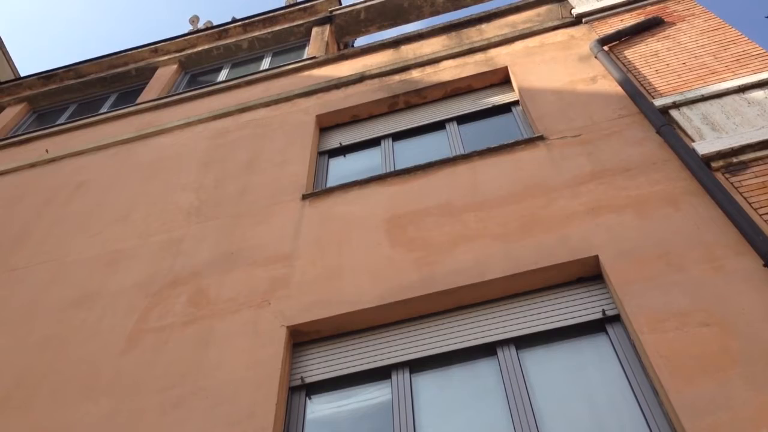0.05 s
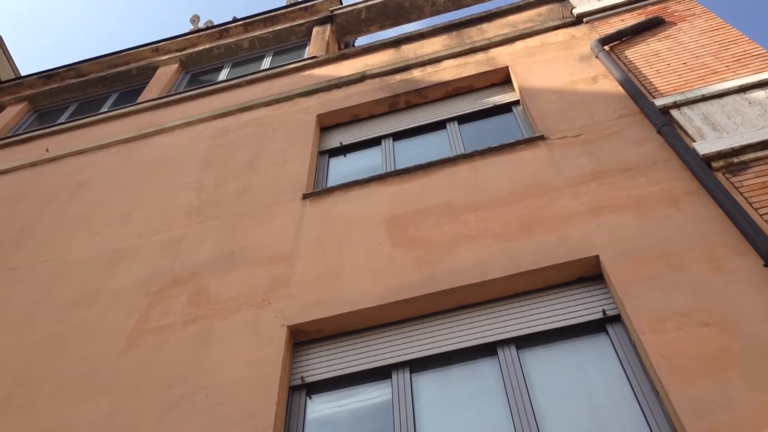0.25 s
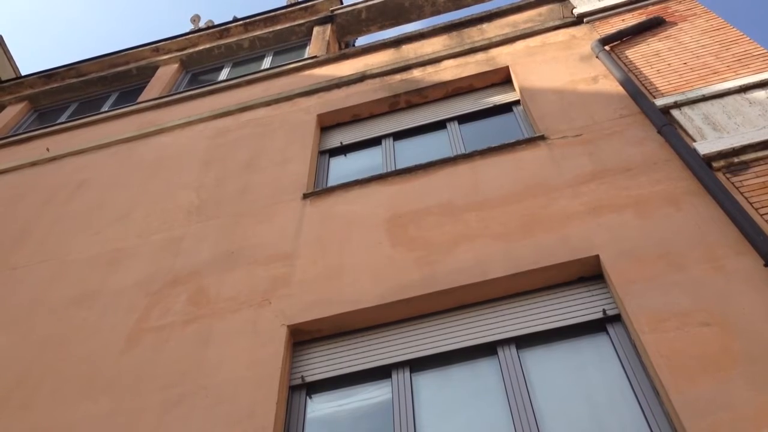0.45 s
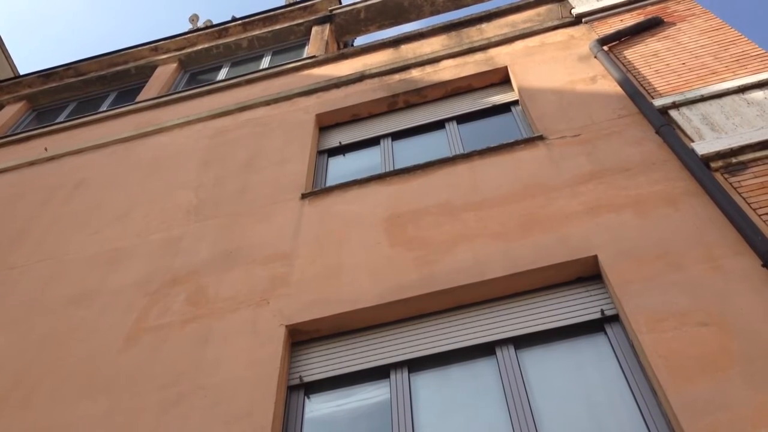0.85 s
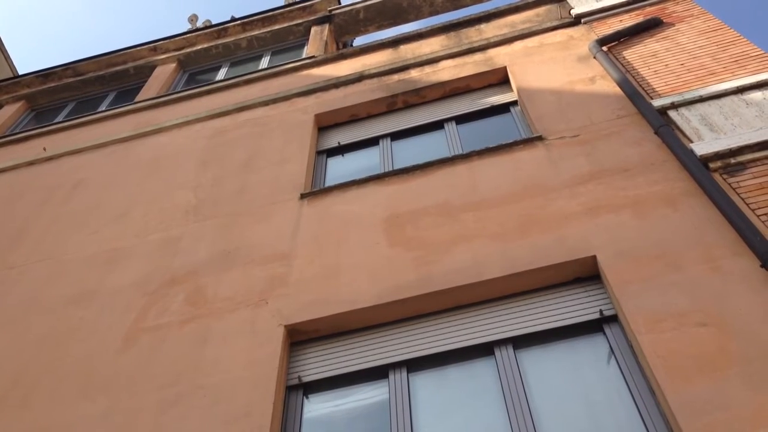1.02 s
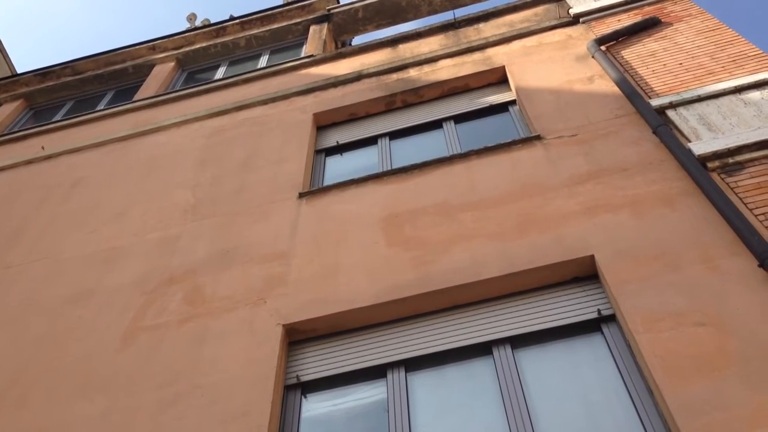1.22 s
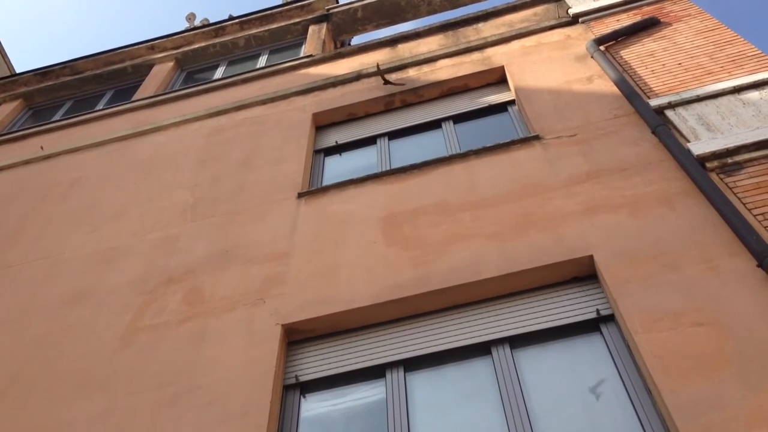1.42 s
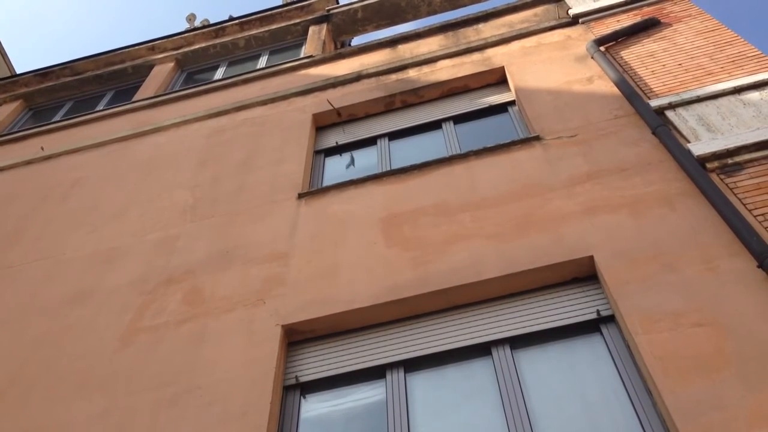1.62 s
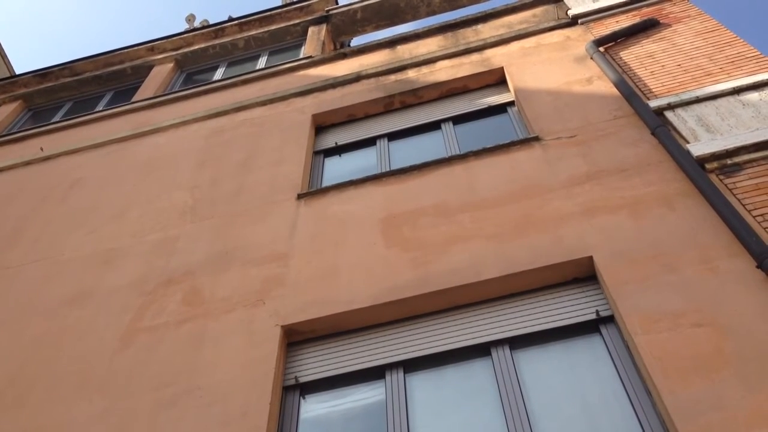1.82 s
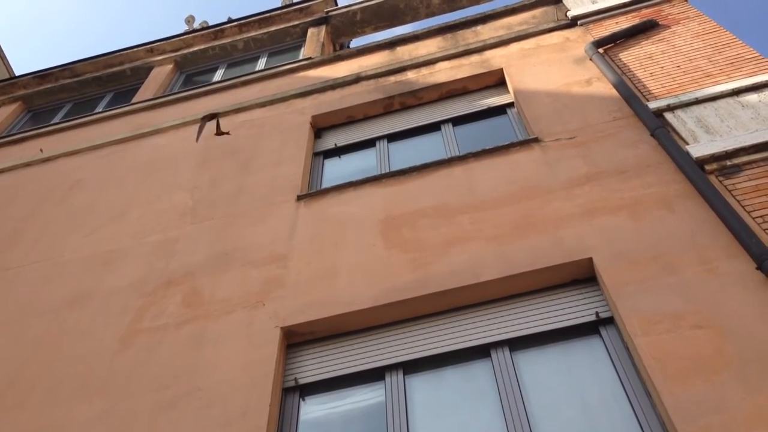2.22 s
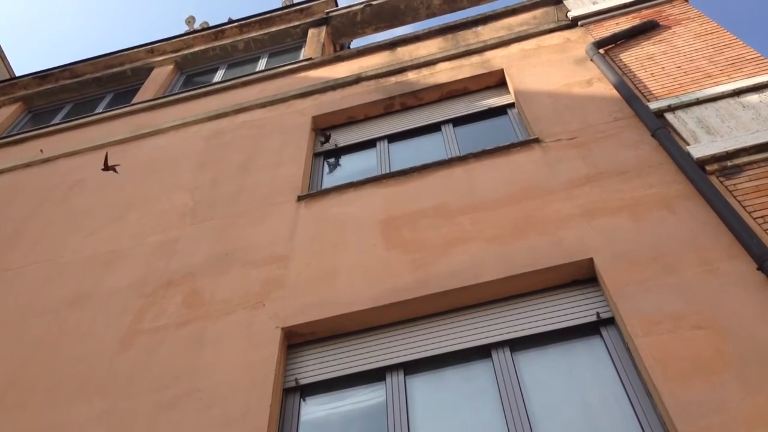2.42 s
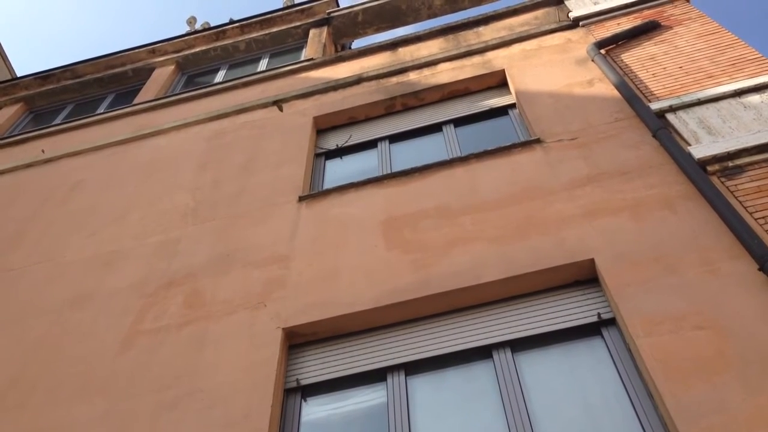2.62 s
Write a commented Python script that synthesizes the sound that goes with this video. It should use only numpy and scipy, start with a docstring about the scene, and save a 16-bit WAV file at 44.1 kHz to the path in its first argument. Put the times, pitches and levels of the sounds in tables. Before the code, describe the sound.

High, trilling swift screams, hoarse at times, alternate with thin arched whistles from a second bird. Heard outdoors beside a building, the calls have a short echo, with a quiet rumble of town traffic underneath.

```python
"""Swifts duetting over a town

Swifts chase past a house front, over distant traffic, a motor's hum and faint rustles.
One bird's syrinx gives shrill trilled screams that break up into chips; when hoarse, its two sides
sound at different pitches. Another answers each scream with a thin arched whistle that beats
and stutters as it falls. The walls echo both."""
import sys
import numpy as np
from scipy import signal
from scipy.fft import rfft, irfft
from scipy.io import wavfile
from scipy.ndimage import uniform_filter1d

SR = 44100
rng = np.random.default_rng(int(sys.argv[2]) if len(sys.argv) > 2 else 0)


def inscribe(sig):
    """Save sig as 16-bit PCM at rate SR to the path in sys.argv[1].

    A 1-D sig is mono; a 2-D sig holds one channel per row.
    Samples are clipped to [-1, 1] before scaling.
    """
    pcm = np.round(np.clip(np.atleast_2d(sig).T, -1, 1) * 32767)
    wavfile.write(sys.argv[1], SR, pcm.astype(np.int16))


N = 121275
T = np.arange(N) / SR


def amp(db):
    return 10 ** (np.asarray(db) / 20)


def unit(x):
    return x / np.sqrt(np.mean(x ** 2))


def walk(rate_hz):
    """Smooth random drift, unit RMS."""
    width = max(int(SR / rate_hz), 1)
    smoothed = uniform_filter1d(rng.standard_normal(N), width, mode="wrap")
    return unit(uniform_filter1d(smoothed, width, mode="wrap"))


def curves(rows):
    """Each column after the first, interpolated over time."""
    times_s, *columns = np.array(rows, float).T
    return [np.interp(T, times_s, column) for column in columns]


def gate(start_s, end_s, edge_s=.0039):
    return np.clip((T - start_s) / edge_s, 0, 1) * np.clip((end_s - T) / edge_s + 1, 0, 1)


def noise(gain):
    """Unit-RMS noise shaped by gain(Hz)."""
    bins_hz = np.fft.rfftfreq(N, 1 / SR) + 1e-3
    return unit(irfft(rfft(rng.standard_normal(N)) * gain(bins_hz), N))


def spectrum(points):
    """Gain function through (frequency [Hz], gain [dB]) points."""
    hz, db = np.array(points, float).T
    return lambda f: amp(np.interp(np.log(f), np.log(hz), db))


def phase(hz):
    return 2 * np.pi * np.cumsum(hz) / SR


def town():
    """Distant traffic as broad noise; one motor's wavering hum as a narrow band."""
    # traffic spectrum (frequency [Hz], relative density [dB])
    traffic_spectrum = [(20, -18), (35, -17), (55, 5), (90, -3.5), (150, 4), (230, 0), (350, -5.5),
                        (600, -10), (1000, -13.5), (1700, -13), (2800, -24.5), (4500, -22), (6000, -29.5),
                        (8000, -31.5), (10500, -30), (12300, -27), (15000, -34.5)]
    # traffic envelope (time [s], level [dB])
    traffic_level = [(0, -54), (.9, -52), (1.7, -51.5), (2.75, -52)]
    # motor envelope (time [s], level [dB])
    hum_level = [(0, -79), (1.1, -72), (1.6, -61.5), (2.5, -59.5), (2.75, -70)]
    hum_hz, half_width_hz = 473.6, 20.5
    traffic = noise(spectrum(traffic_spectrum)) * amp(curves(traffic_level)[0] + .4 * walk(6))
    hum = noise(lambda f: 1 / (1 + ((f - hum_hz) / half_width_hz) ** 2)) * amp(curves(hum_level)[0])
    return traffic + hum


def rustles():
    """Faint rustles and a tick: half-sine bursts of band noise."""
    # bursts (start [s], length [s], centre [Hz], width [octaves], level [dB])
    bursts = [(1.319, .007, 5000, 0.51, -53), (1.859, 0.04, 9900, 0.41, -60.5),
              (1.862, .022, 4440, .1, -58), (1.864, 0.02, 330, 0.6, -55), (1.911, 0.055, 1310, 0.53, -58)]
    out = np.zeros(N)
    for start_s, length_s, hz, width_oct, db in bursts:
        band = noise(lambda f: np.exp(-.5 * (np.log2(f / hz) / width_oct) ** 2))
        out += amp(db) * np.sin(np.pi * np.clip((T - start_s) / length_s, 0, 1)) * band
    return out


def street(x):
    """Direct sound, one reflection from the house front, a diffuse tail from the other walls."""
    wall_s, wall_db = .0105, -9.5
    t60_s, rise_s, tail_db = .64, .02, -13.5
    echo = np.interp(T - wall_s, T, x, left=0)
    tail = noise(lambda f: 1 / np.hypot(1, f / 9000)) * amp(-60 * T / t60_s) * np.clip(T / rise_s, 0, 1)
    reverb = signal.fftconvolve(x, unit(tail) / np.sqrt(N))[:N]
    return x + amp(wall_db) * echo + amp(tail_db) * reverb


def voice_colour(x):
    """Microphone colouring of both voices: a dip near 8 kHz, a resonance near 12 kHz."""
    # microphone response (frequency [Hz], gain [dB])
    response = [(3000, 3.5), (7400, -0.5), (8100, -8), (9000, -6.5), (10800, -3), (11800, -0.5),
                (12600, -1.5), (13600, -9.5), (14500, -11), (15400, -2)]
    bins_hz = np.fft.rfftfreq(2 * N, 1 / SR) + 1e-3
    return irfft(rfft(x, 2 * N) * spectrum(response)(bins_hz))[:N]


def syrinx(hz, octave_db):
    """A bird's voice: a nearly pure tone with a weak octave."""
    angle = phase(hz)
    return np.sqrt(2) * (np.sin(angle) + amp(octave_db) * np.sin(2 * angle))


def chips():
    """Short gliding notes with a quick rise, mostly at the ends of screams."""
    # chips (start [s], length [s], pitch [Hz], glide [Hz], level [dB])
    notes = [(0.846, 0.0033, 6130, -400, -39), (.888, 0.0076, 5830, -100, -37.5),
             (0.896, 0.012, 5880, -2, -44), (0.9158, 0.0047, 5516, -350, -35.5),
             (0.925, 0.013, 5430, 104.5, -53), (1.267, 0.012, 6880, 150, -36),
             (1.291, 0.023, 6910, -2, -41), (1.320, 0.013, 6600, -100, -46.5),
             (1.35, 0.0035, 5070, -400, -35.5), (1.354, 0.013, 5100, 106, -56),
             (1.839, 0.012, 6490, 399.5, -45), (1.848, 0.0042, 6150, -500, -39.5),
             (1.851, 0.0064, 6460, -0.5, -52), (1.869, 0.013, 6710, -2, -45.5),
             (1.896, 0.016, 6600, 1.5, -52), (2.439, 0.014, 6640, 251.5, -44),
             (2.466, 0.016, 6500, -100, -44), (2.494, .004, 5660, 301.5, -39)]
    out = np.zeros(N)
    for start_s, length_s, hz, glide_hz, db in notes:
        progress = np.clip((T - start_s) / length_s, 0, 1)
        envelope = amp(db) * np.abs(np.sin(np.pi * progress ** .57)) ** .78
        out += envelope * syrinx(hz + glide_hz * (progress - .5) + 60 * walk(910), octave_db=-23)
    return out


def whistle(contour):
    """A thin arched note that beats against a tone just above it and stutters as it falls."""
    beat_hz, stutter_hz, stutter_below_hz = 233, 70.4, 6000
    hz, db, depth = curves(contour)
    start_s, end_s = contour[0][0], contour[-1][0]
    low = np.clip((stutter_below_hz - hz) / 400, 0, 1)
    late = np.clip(.16 + (T - start_s) / (end_s - start_s), 0, 1)
    stutter = 1 + .92 * low * late * np.cos(2 * np.pi * stutter_hz * (T - end_s + .0033))
    hz = hz + (5 + 40 * depth + 80 * low ** 2) * walk(600)
    octave_db = -11 - 8 * low
    tone = (syrinx(hz, octave_db) + depth * syrinx(hz + beat_hz, octave_db)) / np.hypot(1, depth)
    flutter_db = (1.8 + 2 * depth) * walk(110)
    return gate(start_s, end_s) * amp(db - 4.5 * low + flutter_db) * np.maximum(stutter, .1) * tone


def trill(cycle, rough, age_s):
    """One pulse per cycle, deepening at onset; narrower and less even when hoarse."""
    onset_s = .015
    sharpness = (.64 + .13 * rough) * np.clip(age_s / onset_s, 0, 1) ** 2
    pulses = (.51 - .5 * np.cos(cycle)) ** sharpness
    local_rms = np.sqrt(uniform_filter1d(pulses ** 2, size=1000))
    scatter_db = 1.76 * (.5 + rough) * walk(260)
    return pulses / local_rms * amp(scatter_db)


def split_voice(hz, rough):
    """The two sides of the syrinx sound apart; the upper one grows with hoarseness."""
    split_hz, octave_db = 480, -22.5
    jitter_hz, upper_gain = 10.4 + 113 * rough, .75 * rough
    lower_hz = hz - split_hz * upper_gain ** 2 / (1 + upper_gain ** 2)  # power stays centred on hz
    lower = syrinx(lower_hz + jitter_hz * walk(606), octave_db)
    upper = syrinx(lower_hz + split_hz + jitter_hz * walk(610), octave_db)
    return (lower + upper_gain * upper) / np.hypot(1, upper_gain)


def rasp(hz):
    """Hoarse hiss, plus a faint blurred tone below the voice."""
    # hiss spectrum (frequency [Hz], relative density [dB])
    hiss_spectrum = [(2500, -17), (3500, -8), (4300, 1.5), (5000, 2), (6000, 2.5), (7000, -10), (7900, 0),
                     (9000, -1), (10000, -16), (12400, 1), (13200, -1), (15000, -45)]
    hiss = noise(spectrum(hiss_spectrum))
    low_tone = np.sin(phase(.66 * hz + 191 * walk(1500)))
    return amp(-18) * hiss + amp(-24.5) * low_tone


def scream(contour, trill_span_hz):
    """A high tone chopped into fast chirping pulses; hoarseness makes it split, stray and rasp."""
    undertone_above_hz, undertone_decay_s, rasp_rise_s = 6450, .045, .26
    hz, db, rough = curves(contour)
    start_s, end_s = contour[0][0], contour[-1][0]
    rough, age_s = np.clip(rough, 0, 1), np.abs(T - start_s)
    trill_hz = np.interp(T, [start_s, end_s], trill_span_hz)
    cycle = phase(trill_hz * (1 + (.012 + .1 * rough ** 2) * walk(213)))
    pulses = trill(cycle, rough, age_s)
    sweep_hz = (80 + 70 * rough) * np.sin(cycle + 2 * np.pi * .02)
    hz = hz + sweep_hz + 69 * rough * walk(92)
    voice = split_voice(hz, rough)
    high = np.clip((hz - undertone_above_hz) / 300, 0, 1)
    undertone = amp(-11) * np.exp(-age_s / undertone_decay_s) * high * np.sin(phase(hz / 2))
    rasp_gain = np.sqrt(rough) * np.clip(age_s / rasp_rise_s, 0, 1)
    return gate(start_s, end_s) * amp(db) * pulses * (voice + undertone + rasp_gain * rasp(hz))


def swifts():
    """One bird screams and chips; the other whistles in answer."""
    # one contour per scream (time [s], pitch [Hz], level [dB], roughness [about 0-1])
    scream_contours = [
        [(.189, 5100, -47.5, 0.03), (.198, 5900, -54.5, 0), (.218, 6910, -43.5, 0.02),
         (.245, 7110, -47.5, 0.01), (.31, 7170, -40.5, 0.19), (.345, 7150, -37.5, 0.73),
         (.378, 7060, -37, 0.75), (.396, 6566, -34.5, 0.23), (.428, 6612, -33.5, 0.19),
         (.51, 6710, -36.5, 0.39), (.545, 6670, -37, 0.44), (.61, 6810, -43.5, 0.37), (.68, 6455, -46.5, 0.78),
         (.745, 6140, -46.5, 0.92), (.79, 6120, -53.5, 1.01), (.865, 6000, -56, 0.93)],
        [(1.043, 4830, -51, 0), (1.053, 5620, -38, 0.2), (1.072, 6115, -38.5, 0.08), (1.102, 6170, -41, 0),
         (1.123, 6240, -38, 0.02), (1.139, 6200, -40.5, 0.2), (1.16, 6340, -37, 0.2), (1.193, 6190, -43, 0.45),
         (1.24, 6300, -42, 0.73), (1.26, 6350, -63, 0.87)],
        [(1.597, 6200, -60, 0.06), (1.625, 6740, -47.5, 0.17), (1.675, 6860, -51.5, 0.26),
         (1.715, 6730, -47.5, .3), (1.752, 6170, -48, 0.52), (1.802, 5985, -43.5, 0.41),
         (1.835, 6150, -53, 0.58)],
        [(2.18, 6440, -55, 0.01), (2.208, 6700, -54, .1), (2.218, 6500, -43, 0), (2.25, 6460, -48, .3),
         (2.285, 6020, -46.5, 0.35), (2.315, 6260, -45, 0.08), (2.37, 6220, -48, 0.77),
         (2.428, 6080, -51.5, 1.05)],
    ]
    # pulse rate per scream (at start [Hz], at end [Hz])
    trill_spans = [(274.5, 230), (262, 232), (256, 200), (258, 250)]
    # one contour per whistle (time [s], pitch [Hz], base level [dB], beat depth [0-1])
    whistle_contours = [
        [(.505, 4470, -48, 0.14), (.543, 5700, -48, .3), (.57, 5950, -59, 0.7), (.85, 5900, -64, 0.82),
         (.95, 5790, -64, 0.54), (.972, 5660, -52, .1), (.996, 5400, -52, .1), (1.005, 5240, -44, 0.44),
         (1.037, 4550, -54, 0.6)],
        [(1.278, 5120, -55, .1), (1.308, 5720, -46, 0), (1.365, 5900, -60, 0.7), (1.41, 5760, -55.5, 1),
         (1.46, 5910, -57, 0.9), (1.535, 5960, -60, 0.73), (1.57, 5830, -51, 0.3), (1.61, 5260, -51, 0.3),
         (1.656, 4160, -61.5, 0.6)],
        [(1.896, 4970, -46, .1), (1.925, 5730, -52, 0.2), (1.955, 5870, -55, 0.25), (2.03, 5914, -53.5, 0.1),
         (2.125, 5980, -62, 0.34), (2.17, 5820, -52.5, 0.4), (2.215, 5200, -50.5, 0.2),
         (2.253, 4250, -55.5, .1)],
        [(2.492, 5050, -41.5, 0), (2.508, 5340, -44.5, 0.04), (2.528, 5720, -56.5, 0.7),
         (2.565, 5810, -52.5, 0), (2.61, 5810, -51.5, 0.03), (2.66, 5720, -56, 0.34), (2.728, 5710, -58, 0.6),
         (2.75, 5770, -44.5, 0.2)],
    ]
    screams = sum(scream(contour, span) for contour, span in zip(scream_contours, trill_spans))
    whistles = sum(whistle(contour) for contour in whistle_contours)
    return voice_colour(screams + whistles + chips())


def scene():
    return (street(swifts()) + town() + rustles())[None]


def record(dry):
    """Steep low-pass on the top treble."""
    cutoff_hz = 15400
    return signal.sosfilt(signal.ellip(10, .2, 80, cutoff_hz, fs=SR, output="sos"), dry)


dry = scene()
out = record(dry)
inscribe(out)
```